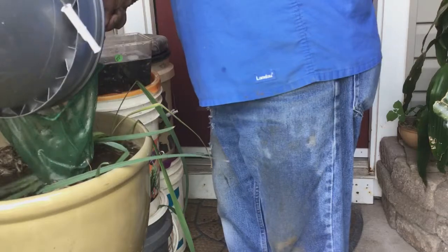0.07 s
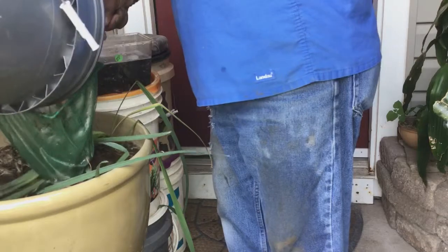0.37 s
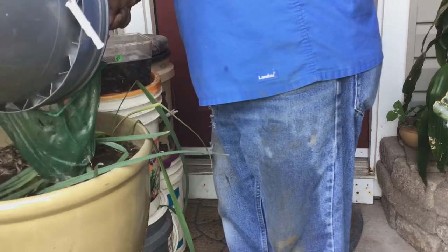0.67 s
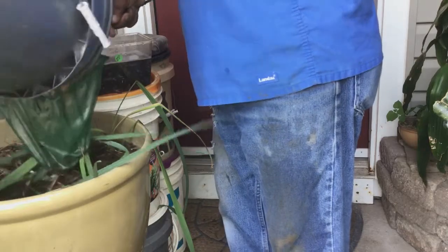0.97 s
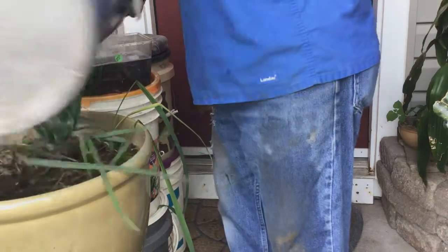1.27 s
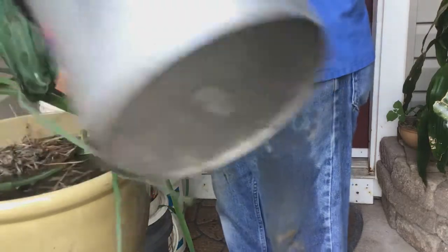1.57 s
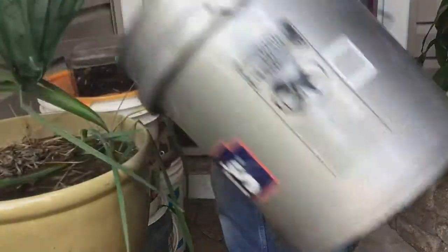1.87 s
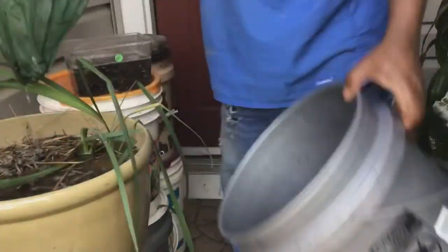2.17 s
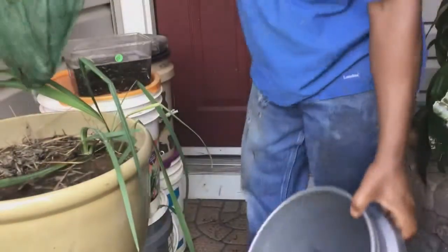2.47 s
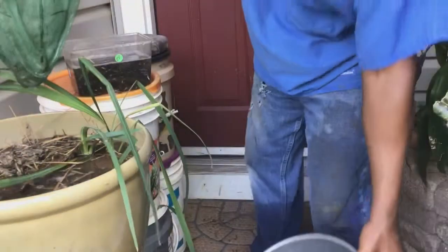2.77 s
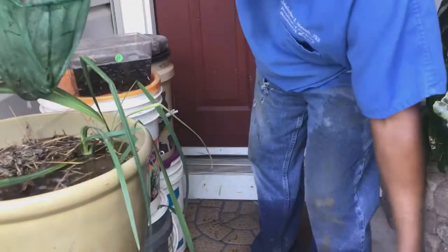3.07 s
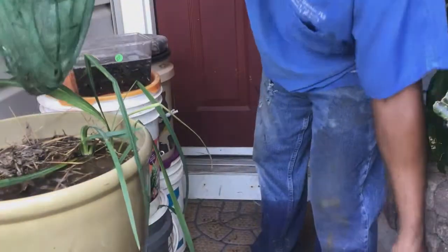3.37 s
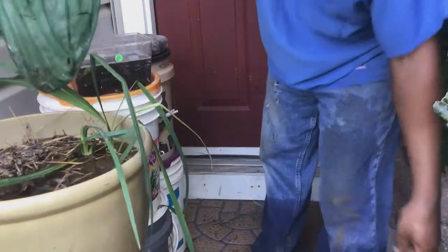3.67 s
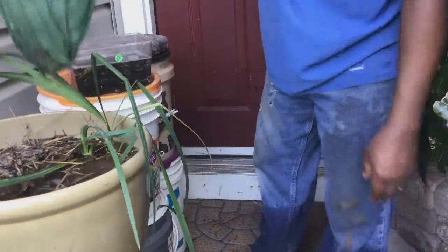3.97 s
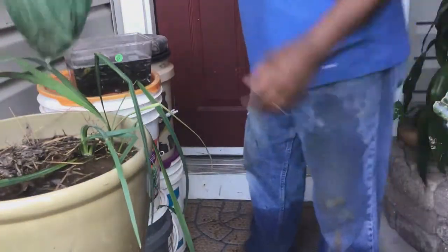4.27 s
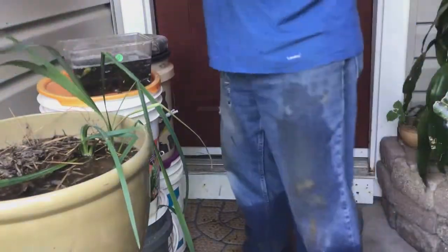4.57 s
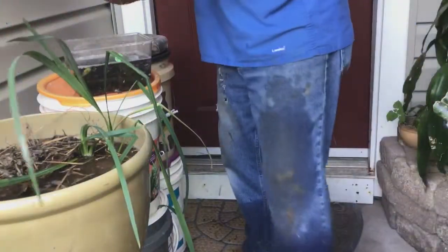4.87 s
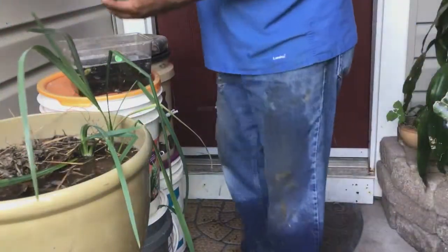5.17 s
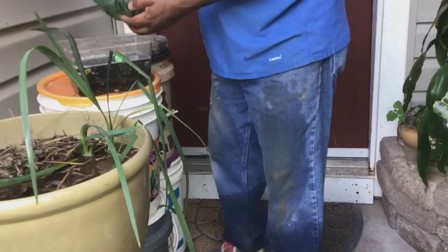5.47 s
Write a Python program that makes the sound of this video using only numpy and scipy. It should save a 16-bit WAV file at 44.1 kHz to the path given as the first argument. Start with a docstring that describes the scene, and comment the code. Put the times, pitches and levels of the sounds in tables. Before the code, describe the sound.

Over a quiet outdoor rumble and soft hiss, clothes and leaves rustle lightly while an empty plastic bucket is moved nearby. The bucket rasps briefly, touches down on a paved porch with a little clatter and thumps hollowly. After some faint taps it is bumped again, the loudest knock, with a smaller one right behind it. The porch walls add a short echo.

```python
"""On a paved porch, an empty plastic bucket is swung away from a planter, scraped once, set down and bumped.
Each dull knock excites its normal modes: the air column and base boom, the wall clatters. Friction gives
the rubbing, rasping and skidding, and the faint rustle of clothes, shoes and leaves. Faint pitched ticks,
a low outdoor rumble and a hiss lie under it all, and the porch walls answer with brief reverberation."""
import sys
import numpy as np
from scipy import signal
from scipy.fft import rfft, irfft, next_fast_len
from scipy.io import wavfile
from scipy.ndimage import uniform_filter1d, map_coordinates

SR = 44100
rng = np.random.default_rng(int(sys.argv[2]) if len(sys.argv) > 2 else 0)


def output_pcm(signal):
    """Save a mono or channel-first signal as 16-bit PCM at the path in sys.argv[1].

    Samples are clipped to [-1, 1] before scaling.
    """
    pcm = np.clip(np.atleast_2d(signal).T, -1, 1) * 32767
    wavfile.write(sys.argv[1], SR, np.round(pcm).astype(np.int16))


N = 242991

# Spectra of the distant rumble and the hiss: frequency_hz, gain_db
RUMBLE_SPECTRUM = [(15, -74), (25, -30.5), (86, 2.5), (103, 3.5), (139, -9), (168, -5.5), (205, -7.5),
                   (239, -3.5), (356, -24.5), (379, -46), (409, -23), (500, -25.5), (650, -20.5),
                   (1100, -120)]
HISS_SPECTRUM = [(180, -33), (300, -4.5), (378, -7.5), (417, -6.5), (500, -12), (641, -0.5), (863, -10.5),
                 (953, -6.5), (2100, -7.5), (2690, -8.5), (4280, -10), (15500, -25.5)]
# Slow course of the rumble: time_s, level_db
RUMBLE_COURSE = [(0, -59), (.9, -62), (1.4, -61), (2.3, -61.5), (3.8, -60), (4.4, -60.5), (5.5, -60)]
# Patchiness of the hiss, less in the treble: frequency_hz, depth_db
HISS_PATCHES = [(4500, 3.6), (7000, 2.8)]
# Reverberation time of the porch: frequency_hz, t60_s
PORCH_DECAY = [(100, 0.35), (1000, 0.27), (4000, 0.26), (12000, 0.11)]
# Spectrum of crinkling clothes and leaves: frequency_hz, gain_db
CRINKLE_SPECTRUM = [(300, -19), (1500, 3), (3500, 2), (5200, 4), (6500, -8), (9000, -0.5), (11000, -20.5),
                    (15500, -8)]
# How briskly they are moved: time_s, gain_db
RUSTLE_MOTION = [(0, 7.5), (1.2, -0.5), (2.0, 2.5), (3.9, 1), (4.7, 0), (5.5, 4.5)]
# Faint pitched ticks: start_s, level_db, pitch_hz
TICK_EVENTS = [(0.331, -56, 5070), (0.603, -56, 1800), (0.65, -60, 1540), (0.902, -58, 5040),
               (1.59, -55.5, 2920), (1.656, -58.5, 5140), (1.752, -56.5, 2830), (1.89, -56, 2040),
               (2.496, -53, 3050), (2.713, -57.5, 2630), (4.991, -62, 5970)]
# Strokes of cloth, shoes and leaves: start_s, relative_level_db, centre_hz, half_width_octaves, length_s
BRUSH_STROKES = [(1.233, -56.5, 1190, 1.2, 0.033), (1.588, -58, 3360, 0.83, 0.053),
                 (2.065, -55, 780, 0.99, 0.052), (2.215, -58.5, 3400, 0.54, 0.053),
                 (2.667, -54.5, 3080, 0.69, 0.034), (2.728, -52, 1010, 0.94, 0.045),
                 (2.826, -59, 10700, 5.9, 0.037), (3.164, -57, 1280, 0.89, 0.038),
                 (3.652, -57, 5100, 0.52, 0.018), (3.773, -56.5, 3950, 0.44, 0.042),
                 (4.302, -54.5, 7700, 0.37, 0.0055), (4.372, -58.5, 2560, 0.69, .04),
                 (4.528, -57.5, 1240, 0.84, 0.046), (4.746, -58, 4100, 0.59, 0.032),
                 (5.354, -53, 1630, 0.68, 0.025), (5.369, -58.5, 3550, 0.36, 0.03)]
# Shifts of the tipped bucket: start_s, level_db, length_s
BUCKET_SHIFTS = [(0.066, -57.5, 0.1), (0.412, -55.5, 0.066), (0.774, -61, 0.071)]
# Slips of the rim: start_s, level_db, t60_s
RIM_SLIPS = [(2.140, -46, 0.2), (2.152, -48, 0.24), (2.197, -51, 0.064)]
# Friction spectra of the hollow rub, the rim's rasp and the base's skid: frequency_hz, gain_db
RUB_SPECTRUM = [(150, 2), (270, 2.5), (350, -7), (480, 3), (800, -2), (1400, -12), (3000, -9), (8000, -61)]
RASP_SPECTRUM = [(88, -27), (150, 7), (205, -5), (274, -17), (346, -3), (607, -4.5), (860, -11.5),
                 (2060, -9.5), (2360, -15), (6110, -11), (15500, -15.5)]
SKID_SPECTRUM = [(200, -25), (520, -15), (560, 5), (610, -14), (950, -2), (1400, 2), (2200, -5),
                 (3000, -17), (8000, -28), (15000, -36)]
# Resonances of the handle: centre_hz, width_hz, gain_db
HANDLE_MODES = [(3640, 400, 6.5), (5000, 330, 7), (6130, 480, 3), (7540, 180, -8), (10900, 120, -4)]
# Normal modes of the bucket, air column lowest, then base, then wall: pitch_hz, gain_db, t60_s
BUCKET_MODES = [(104, -11.5, .42), (110, -13, .06), (85, -16, .07), (213, 3, .24), (250, -9, .15),
                (305, -14, .08), (355, -8.5, .085), (401, -10, .11), (468, -9, .08), (564, -20, .22),
                (808, -16.5, .12), (885, -17, .09), (977, -13.5, .095), (1042, -20, .11), (1157, -17, .08),
                (1282, -14, .075), (1368, -12, .055), (1535, -13.5, .055), (1640, -11.5, .045),
                (1890, -25, .11), (2143, -24, .1)]
# Heavily damped plastic around the contact: pitch_hz, gain_db, t60_s
SMACK_MODES = [(398, 3.5, 0.022), (910, -1.5, 0.015), (1440, 3.5, 0.011)]
# Wall modes too crowded to be heard singly: frequency_hz, gain_db
CLATTER_SPECTRUM = [(40, -63), (130, 1), (250, 14), (400, -16), (650, -4), (1400, 1.5), (2100, -3),
                    (3000, -6.5), (8000, -4), (15000, -3)]
# Blows on the bucket, with the relative gain of each part: start_s, level_db, cutoff_hz, air_db, edge_db,
# low_wall_db, high_wall_db, clatter_db, smack_db, base_start_pitch_ratio, choke_db
BLOWS = [(2.978, -39.5, 2070, 3, 2, -11, 12, 8, -3, 1.05, -8),
         (2.99, -36.5, 1200, 15, 13.5, -6, -2, -7, -14, 1.025, -15),
         (2.998, -39, 1600, 14, 16.5, -10, -2, 5.5, -13, 1, -15),
         (3.024, -42, 1510, 6, 13.5, -10, 4.5, 12.5, 2.5, 1, -4),
         (3.145, -54, 500, 20.5, -8, -13, -15, -15, -2, 1.13, -13),
         (3.327, -25, 774, 4, -5, -9.5, -8, -8.5, -8.5, 1.1, -24),
         (3.65, -54, 533, -10, 4, -8, -12, 19, 2, 1.53, -13),
         (3.842, -54, 580, -23, -3, 8, 9, 10, -8, 1.07, -15),
         (4.821, -20.3, 1410, 0.5, -5.5, -8.5, 3, -4, 8, 1.04, -20),
         (4.935, -29, 1150, -8, 3.5, -3.5, -5.5, -16, -2.5, 1.02, -26),
         (5.211, -56, 400, -20, -10, -12, -10, 12.5, -10, 1.87, -18)]


def amp(db):
    """Amplitude ratio: tenfold for every 20 dB."""
    return 10 ** (np.asarray(db) / 20)


def unit(x):
    """Normalisation to an rms of 1."""
    return x / np.sqrt(np.mean(x ** 2) + 1e-20)


def along(points, hz):
    """Interpolation of (frequency_hz, value) points on a logarithmic frequency axis."""
    f, v = np.transpose(points)
    return np.interp(np.log(hz + 1), np.log(f + 1), v)


def band(f, centre_hz, octaves):
    """Resonance curve, at half power the given octaves either side of its centre."""
    return 1 / np.hypot(1, (np.log2((f + 1) / centre_hz) / octaves) ** 2)


def fade(t, t60):
    """Exponential damping: 60 dB in t60 seconds."""
    return np.exp(-np.log(1000) * t / t60)


def rise(t, time_constant_s):
    """First-order relaxation from 0 towards 1."""
    return 1 - np.exp(-t / time_constant_s)


def swell(t, length_s):
    """Critically damped pulse, peaking at a third of length_s."""
    u = 3 * t / length_s
    return u * np.exp(1 - u)


def wobble(rate):
    """Slow modulation: a spline through rate random knots a second."""
    knots = rng.standard_normal(int(N * rate / SR) + 4)
    return map_coordinates(knots, [np.arange(N) * rate / SR])


def filtered(x, response):
    """Linear filtering: the spectrum is multiplied by a frequency response."""
    size = next_fast_len(len(x) + 8192)
    return irfft(rfft(x, size) * response(np.fft.rfftfreq(size, 1 / SR)), size)[:len(x)]


def noise(size, response):
    """White noise coloured by a frequency response, at an rms of 1."""
    return unit(filtered(rng.standard_normal(size), response))


def spectral_noise(size, spectrum):
    """Noise whose spectral envelope follows a table."""
    return noise(size, lambda f: amp(along(spectrum, f)))


def gritty(x, grit_db):
    """Surface roughness: millisecond catches modulate the amplitude of friction noise."""
    catches = unit(uniform_filter1d(rng.standard_normal(len(x)), 40))
    return unit(x * amp(grit_db * catches))


def add(track, start_s, sound):
    """Superposition of a sound on the track from start_s."""
    part = track[round(start_s * SR):][:len(sound)]
    part += sound[:len(part)]


def patchy_hiss(patch_bins=5, patch_frames=3):
    """Broadband noise, randomly modulated in small patches of frequency and time."""
    hz, _, spectra = signal.stft(rng.standard_normal(N), SR, nperseg=1024)
    patches = uniform_filter1d(rng.standard_normal(spectra.shape), patch_bins, axis=0)
    patches = unit(uniform_filter1d(patches, patch_frames, axis=1))
    patch_db = along(HISS_PATCHES, hz)[:, None] * patches
    hiss = signal.istft(spectra * amp(patch_db), nperseg=1024)[1][:N]
    return unit(filtered(hiss, lambda f: amp(along(HISS_SPECTRUM, f))))


def outdoors(drift_db=1.2, drift_rate=4, hiss_db=-62.5, flutter_db=-0.1, flutter_rate=14):
    """Ambient noise: a distant rumble drifts in level under a soft hiss that flickers slightly."""
    rumble = spectral_noise(N, RUMBLE_SPECTRUM)
    hiss = patchy_hiss()
    rumble_db = np.interp(np.arange(N) / SR, *np.transpose(RUMBLE_COURSE)) + drift_db * wobble(drift_rate)
    return amp(rumble_db) * rumble + amp(hiss_db + flutter_db * wobble(flutter_rate)) * hiss


def porch(x, low_cut_hz=250):
    """Reverberation: convolution with a diffuse tail, thin in the bass, whose treble dies first."""
    thinned = filtered(x, lambda f: f / np.hypot(f, low_cut_hz))
    delayed = np.pad(thinned, (SR // 200, 0))  # 5 ms
    hz, t, spectra = signal.stft(rng.standard_normal(SR // 3), SR, nperseg=256)
    tail = signal.istft(spectra * fade(t, along(PORCH_DECAY, hz)[:, None]), SR, nperseg=256)[1]
    return signal.fftconvolve(delayed, tail / np.linalg.norm(tail))[:N]


def rustles(base_db=-70.5, snaps_per_s=1500, clump_db=5.0, clump_rate=24):
    """Shot noise: clothes and leaves crinkle in tiny snaps whose level clumps and follows the motion."""
    snaps = (rng.random(N) < snaps_per_s / SR) * rng.standard_normal(N)
    crinkle = filtered(snaps, lambda f: amp(along(CRINKLE_SPECTRUM, f)))
    clumped = unit(crinkle * amp(clump_db * wobble(clump_rate)))
    motion_db = np.interp(np.arange(N) / SR, *np.transpose(RUSTLE_MOTION))
    return amp(base_db + motion_db) * clumped


def ticks(ring_t60=0.13, snap_db=-4, snap_t60=0.056):
    """Exponential decay: faint pitched ticks, each a short snap with a brief narrowband ring."""
    out, t = np.zeros(N), np.arange(SR // 4) / SR
    for start_s, level_db, pitch_hz in TICK_EVENTS:
        ring = noise(len(t), lambda f: band(f, pitch_hz, octaves=0.168) ** 2) * fade(t, ring_t60)
        snap = noise(len(t), lambda f: band(f, pitch_hz, octaves=0.75) ** 2) * fade(t, snap_t60)
        add(out, start_s, amp(level_db) * (ring + amp(snap_db) * snap) * rise(t, 0.0015))
    return out


def brushes(trim_db=-1, ripple_db=3.5, low_cut_hz=150):
    """Light friction of cloth, shoes and leaves: each stroke is a noise band with small resonances."""
    out, t = np.zeros(N), np.arange(SR // 3) / SR
    grid_hz = np.linspace(0, SR / 2, 200)
    for start_s, level_db, centre_hz, octaves, length_s in BRUSH_STROKES:
        resonances_db = ripple_db * rng.standard_normal(len(grid_hz))
        tone = lambda f: band(f, centre_hz, octaves) * f ** 2 / (f ** 2 + low_cut_hz ** 2)
        friction = noise(len(t), lambda f: tone(f) * amp(np.interp(f, grid_hz, resonances_db)))
        stroke = gritty(friction, grit_db=0.6) * swell(t, length_s)
        add(out, start_s, amp(level_db + trim_db) * stroke)
    return out


def rubs(boom_hz=86, boom_octaves=0.56, boom_s=0.18):
    """Friction and cavity resonance: the tipped bucket rubs the planter's bag and its air booms faintly."""
    out, t = np.zeros(N), np.arange(SR // 2) / SR
    for start_s, level_db, length_s in BUCKET_SHIFTS:
        rub = gritty(spectral_noise(len(t), RUB_SPECTRUM), grit_db=1.5) * swell(t, length_s)
        boom = noise(len(t), lambda f: band(f, boom_hz, boom_octaves) ** 2) * swell(t, boom_s)
        add(out, start_s, amp(level_db) * (rub + boom))
    return out


def scrape(handle_db=-41, handle_t60=0.069, snap_db=-39, snap_hz=5000, snap_t60=0.0076):
    """Stick-slip friction: the rim rasps in the grip, and its first jerk snaps the handle on the wall."""
    out, t = np.zeros(N), np.arange(SR // 3) / SR
    onset = rise(t, 0.0001)
    for start_s, level_db, t60 in RIM_SLIPS:
        rasp = gritty(spectral_noise(len(t), RASP_SPECTRUM), grit_db=1.0)
        add(out, start_s, amp(level_db) * rasp * fade(t, t60) * onset)
    peaks = lambda f: sum(amp(db) / (1 + (2 * (f - hz) / width) ** 2) for hz, width, db in HANDLE_MODES)
    handle = noise(len(t), peaks) * fade(t, handle_t60)
    snap = noise(len(t), lambda f: band(f, snap_hz, octaves=0.43)) * fade(t, snap_t60)
    add(out, RIM_SLIPS[0][0], (amp(handle_db) * handle + amp(snap_db) * snap) * onset)
    return out


def skid(start_s=2.98, length_s=0.058, level_db=-45, release_t60=0.08):
    """Sliding friction: the base's edge grinds over the paving between first touch and rest."""
    out, t = np.zeros(N), np.arange(SR // 3) / SR
    grind = gritty(spectral_noise(len(t), SKID_SPECTRUM), grit_db=2.5)
    envelope = rise(t, 0.002) * fade(np.maximum(t - length_s, 0), release_t60)
    add(out, start_s, amp(level_db) * grind * envelope)
    return out


def base_envelope(t, cutoff_hz, choke_db, soft_hz=750, soft_rise_s=0.01, rock_s=0.055, settle_s=0.0025):
    """Contact damping: the base responds, faster to hard blows, rocks, then is choked by the paving."""
    rise_s = soft_rise_s * min(1, soft_hz / cutoff_hz) ** 2
    settled = (1 + np.tanh((t - rock_s) / (2 * settle_s))) / 2
    return rise(t, rise_s) * amp(choke_db * settled)


def knocks(clatter_t60=0.086, clatter_trim_db=-5, detune=0.004, scatter_db=1, sag_s=0.014):
    """Modal superposition: a blow rings the bucket's modes; a softer contact excites fewer high ones."""
    out, t = np.zeros(N), np.arange(SR // 2) / SR
    hz, mode_db, t60 = np.transpose(BUCKET_MODES)
    air, base, edge = hz < 150, (hz > 150) & (hz < 300), (hz > 230) & (hz < 300)
    low_wall, high_wall = (hz > 300) & (hz <= 520), hz > 520
    # the damped air modes start in antiphase to the ringing one, so the boom swells
    polarity = np.where(air & (np.arange(len(hz)) > 0), -1, 1)
    for (start_s, level_db, cutoff_hz, air_db, edge_db, low_wall_db, high_wall_db,
         clatter_db, smack_db, base_ratio, choke_db) in BLOWS:
        contact = lambda f: 1 / np.hypot(1, (f / cutoff_hz) ** 2)
        # the high modes depend on where the blow lands
        strength, stretch, phase = rng.standard_normal((3, len(hz))) * high_wall
        part_db = air_db * air + edge_db * edge + low_wall_db * low_wall + high_wall_db * high_wall
        gains = polarity * amp(mode_db + part_db + scatter_db * strength) * contact(hz)
        # a base that is pressed on rings higher at first, then sags to its own pitch
        lead_s = (base_ratio - 1) * sag_s * rise(t, sag_s)
        cycles = (hz * (1 + detune * stretch))[:, None] * (t + np.outer(base, lead_s))
        modes = np.sin(2 * np.pi * cycles + 0.5 * phase[:, None]) * fade(t, t60[:, None])
        modes[base] *= base_envelope(t, cutoff_hz, choke_db)
        smack = sum(amp(db) * contact(f) * np.sin(2 * np.pi * f * t) * fade(t, smack_t60)
                    for f, db, smack_t60 in SMACK_MODES)
        clatter = noise(len(t), lambda f: amp(along(CLATTER_SPECTRUM, f)) * contact(f))
        clatter *= amp(clatter_db + clatter_trim_db) * fade(t, clatter_t60)
        knock = gains @ modes + amp(smack_db) * smack + clatter
        add(out, start_s, amp(level_db) * rise(t, 0.0025) * knock)
    return out


def scene(reverberation_db=-13.0):
    """Superposition of the direct sound, its reverberation and the outdoor background, in mono."""
    background = outdoors()
    direct = knocks() + scrape() + rubs() + brushes() + ticks() + rustles()
    return (direct + amp(reverberation_db) * porch(direct) + background)[None]


def record(dry, low_cut_hz=50, top_hz=15750):
    """Band limiting: the microphone sheds deep bass and passes nothing above top_hz."""
    thinned = signal.sosfilt(signal.butter(2, low_cut_hz, "highpass", fs=SR, output="sos"), dry)
    return np.array([filtered(x, lambda hz: hz < top_hz) for x in thinned])


dry = scene()
out = record(dry)
output_pcm(out)
```